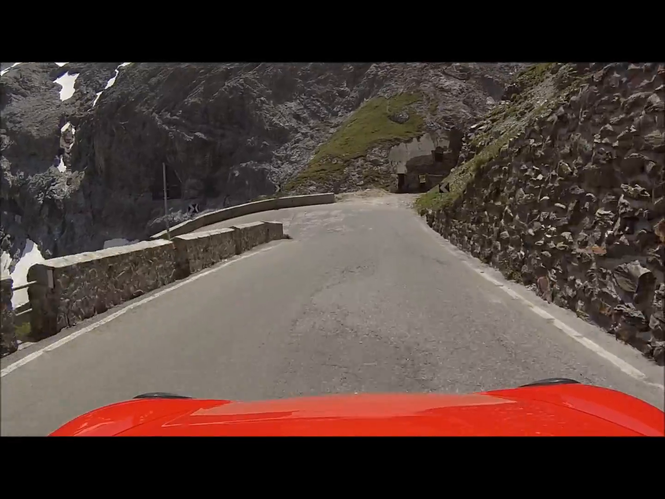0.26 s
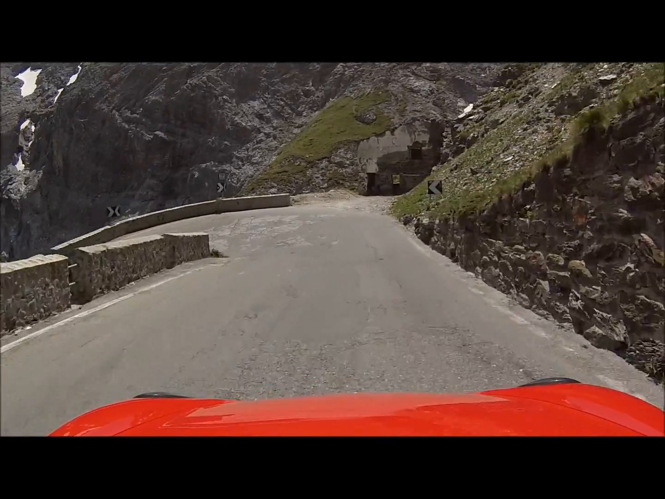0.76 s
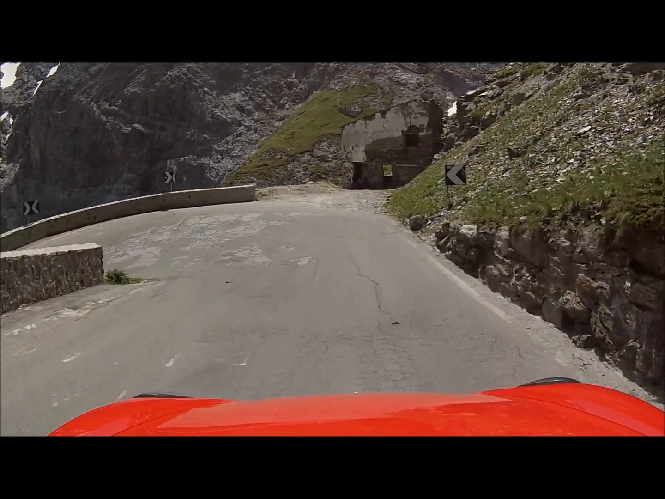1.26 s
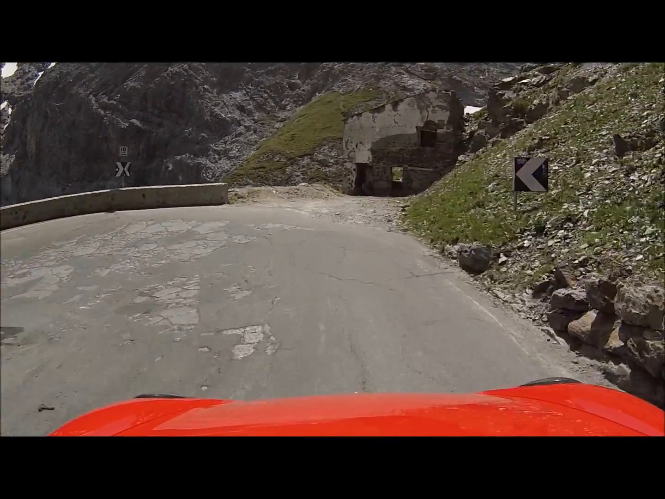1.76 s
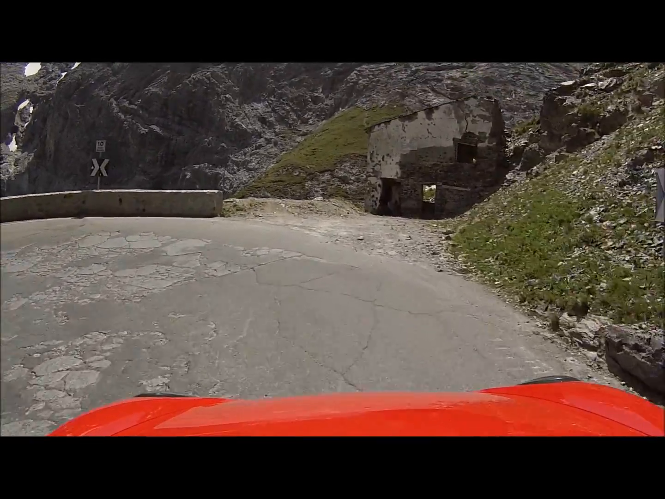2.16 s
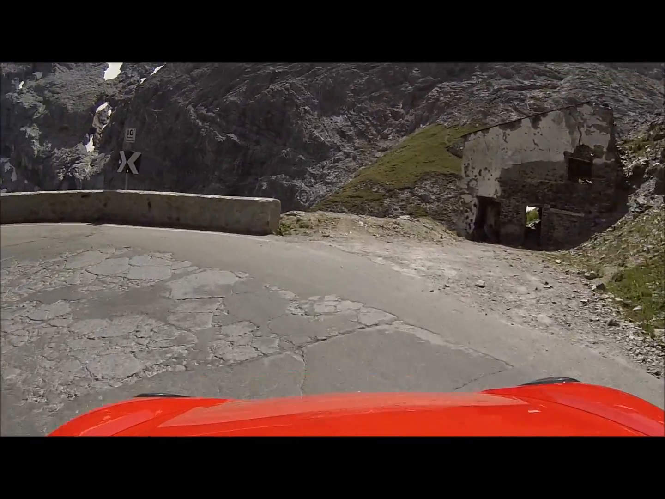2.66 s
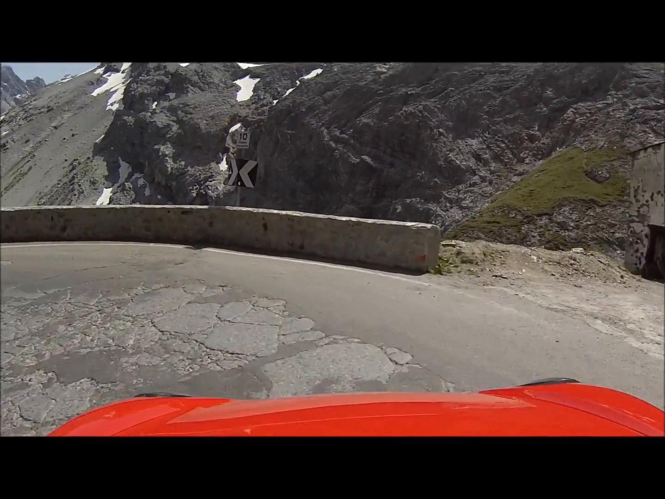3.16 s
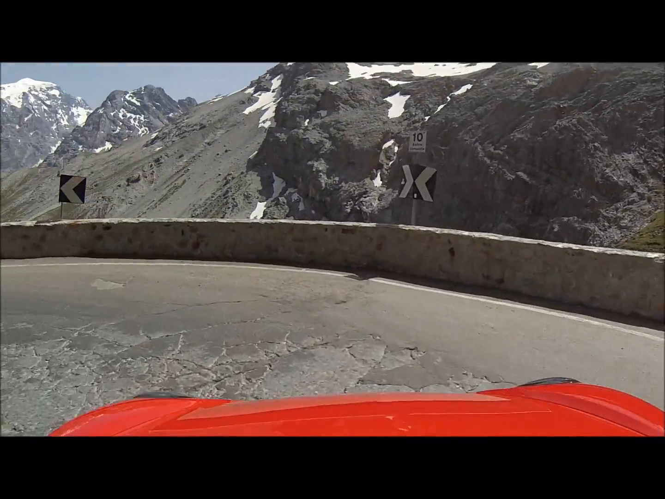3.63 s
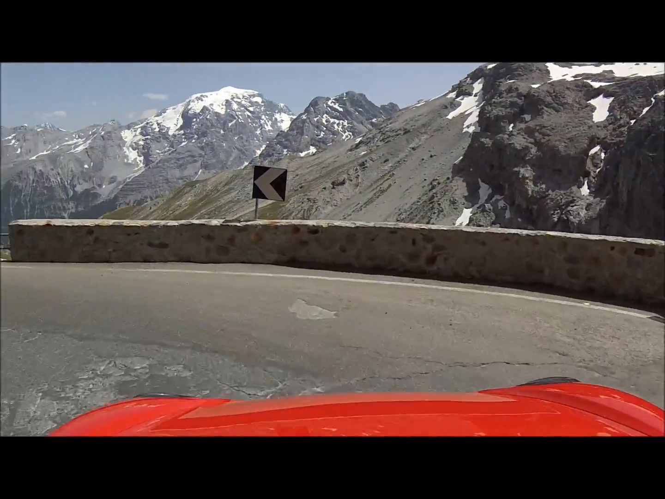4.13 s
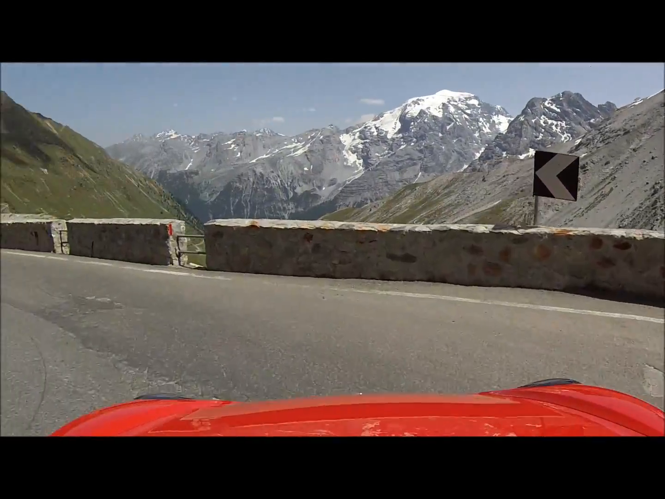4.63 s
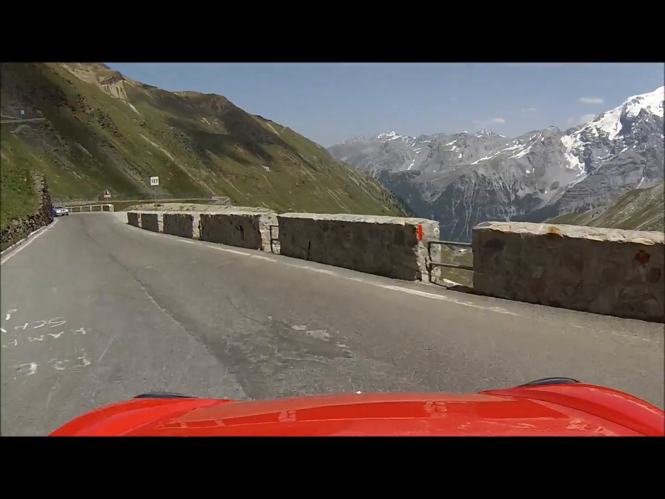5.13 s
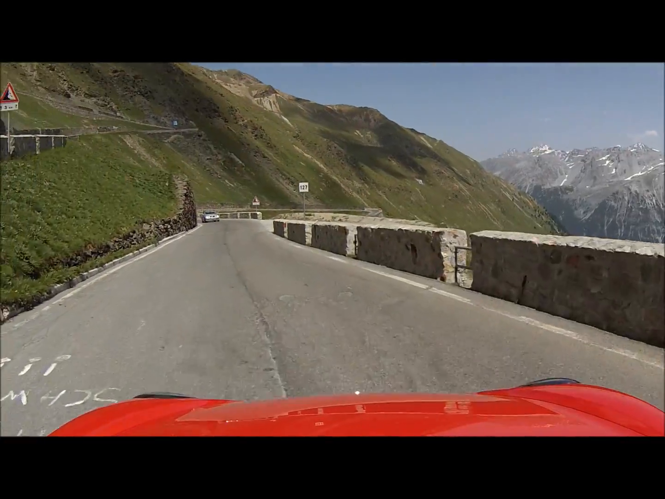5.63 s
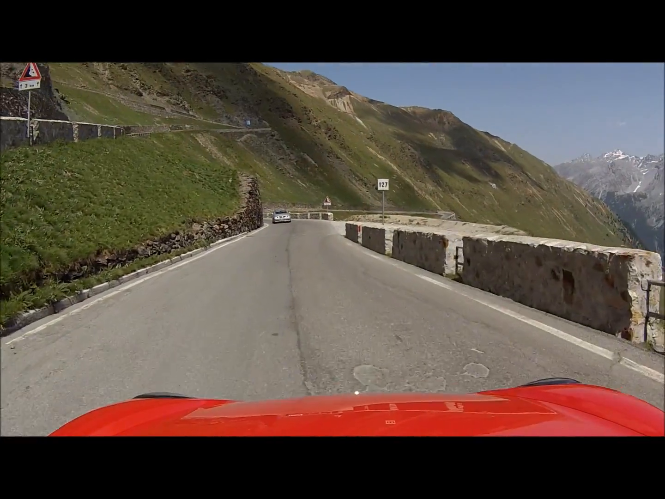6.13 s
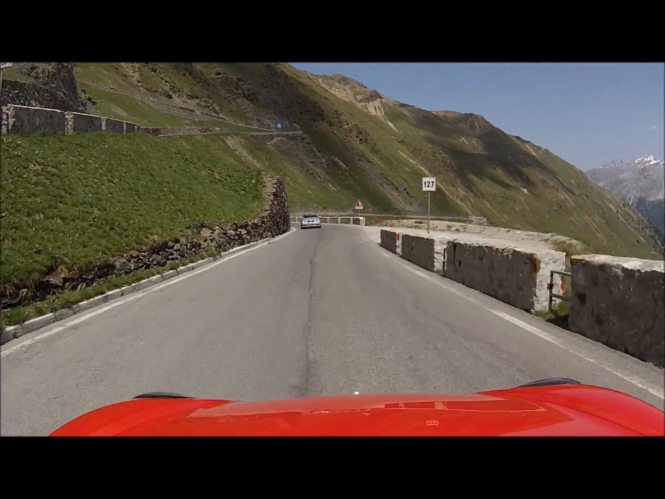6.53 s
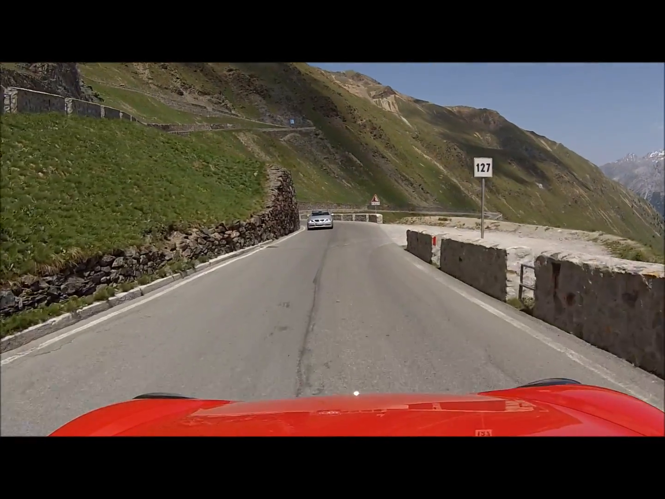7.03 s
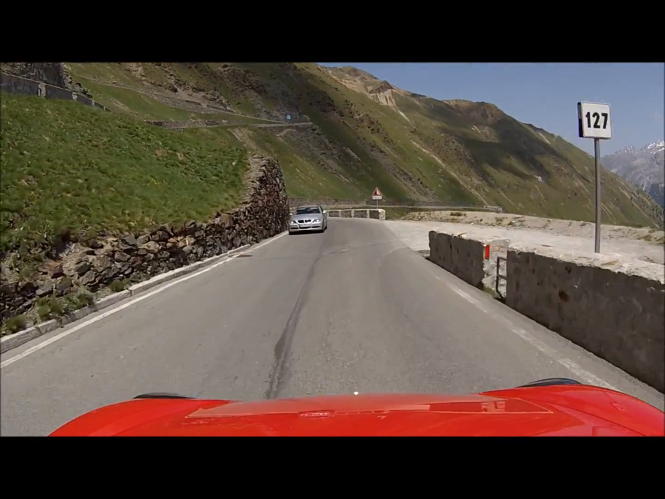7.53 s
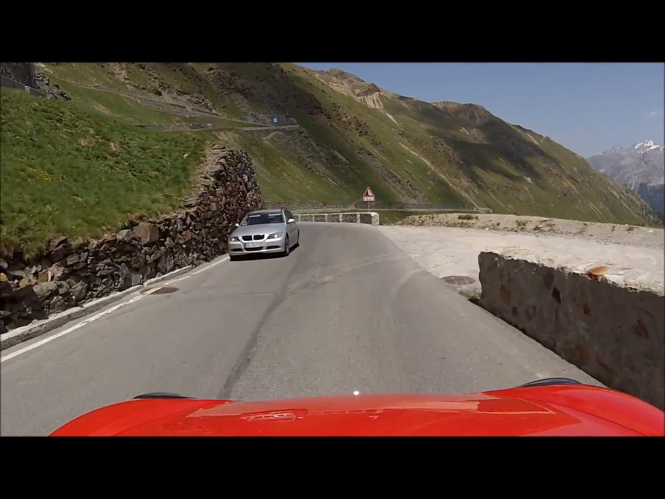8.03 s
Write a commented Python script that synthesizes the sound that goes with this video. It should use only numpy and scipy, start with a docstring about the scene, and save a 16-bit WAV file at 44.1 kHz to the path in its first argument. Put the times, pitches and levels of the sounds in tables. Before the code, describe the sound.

Close on a sports car's body on a mountain road, a six-cylinder engine drops from high revs while its exhaust sputters, cracks and bangs. It settles into a low, soft rumble round a hairpin, with tyre noise, faint grit and ticks. Then the throttle opens and the note climbs, growing hard and full with pulsing intake air.

```python
"""A six-cylinder sports car sinks off high revs, heard on its body, while the exhaust bangs and burbles.
It rolls near idle round a hairpin of cracked asphalt, then pulls away hard with a pulsing rush of air.
The exhaust note is a stack of firing harmonics swept through fixed pipe resonances.
Bangs are filtered spikes with noise puffs; gas, air, tyres and knocks are shaped noise; a whine is pure tones."""
import sys
import numpy as np
from scipy import signal
from scipy.fft import rfft, irfft
from scipy.io import wavfile
from scipy.ndimage import uniform_filter1d

SR = 44100
rng = np.random.default_rng(int(sys.argv[2]) if len(sys.argv) > 2 else 0)


def generate_wav(signal):
    """Clip the signal to [-1, 1] and save it as 16-bit WAV at the path in sys.argv[1]."""
    frames = np.transpose(np.atleast_2d(signal))
    scaled = np.clip(frames, -1, 1) * 32767
    pcm = np.round(scaled).astype(np.int16)
    wavfile.write(sys.argv[1], SR, pcm)


N = 365148
TIME = np.arange(N) / SR  # seconds
MID_REVS_HZ = 80  # firing rate of one bank at middling revs
THROTTLE_OPENS_S, THROTTLE_OPEN_S = 5.005, 5.9  # on leaving the hairpin
BROKEN_ROAD_START_S, BROKEN_ROAD_END_S = 1.9, 4.4  # cracked asphalt in the hairpin
EDGE_HZ = 15300  # upper limit of the band


def amp(db):
    """Decibels to gain."""
    return 10 ** (np.asarray(db) / 20)


def unit(x):
    """Scales to rms 1."""
    return x / np.sqrt(np.mean(x ** 2) + 1e-20)


def curves(rows):
    """Each column of a table as a curve over time."""
    s, *columns = np.transpose(rows)
    return [np.interp(TIME, s, column) for column in columns]


def read(points, hz):
    """Reads a spectrum on a log-frequency axis."""
    f, value = np.transpose(points)
    return np.interp(np.log(hz + 1), np.log(f), value)


def add(mix, s, sound):
    """Mixes a sound in at time s."""
    part = mix[max(round(s * SR), 0):][:len(sound)]
    part += sound[:len(part)]


def ringing(points, size=4096):
    """Causal, minimum-phase impulse response with the given spectrum."""
    log_gain = np.log(amp(read(points, abs(np.fft.fftfreq(size, 1 / SR)))))
    return np.fft.ifft(np.exp(np.conj(signal.hilbert(log_gain)))).real[:size // 2]


def colour(x, points):
    """Passes x through a body with the given spectrum, keeping the power of white noise."""
    response = ringing(points)
    return signal.oaconvolve(x, response / np.linalg.norm(response))[:len(x)]


def resonate(x, hz, width):
    """One resonance of peak gain 1."""
    return signal.lfilter(*signal.iirpeak(min(hz, SR / 2 - 1), hz / width, SR), x)


def bandpass(x, order, low_hz, high_hz):
    """Keeps one band of a sound."""
    return signal.sosfilt(signal.butter(order, [low_hz, high_hz], "band", fs=SR, output="sos"), x)


def wander(rate_hz):
    """Smooth random curve of rms 1, with a new random target rate_hz times a second."""
    steps = rng.standard_normal(N // 40)
    return unit(np.interp(TIME * rate_hz, np.arange(len(steps)), steps))


# Engine speed. Each row: time in seconds, firing rate of one cylinder bank in Hz.
ENGINE_SPEED = [(0, 157.2), (.37, 146.2), (1.1, 128.5), (1.52, 111.2), (1.93, 92), (2.2, 70.4),
                (2.36, 62.6), (2.75, 51.56), (3.1, 46.26), (3.83, 43.4), (4.1, 45.99), (4.6, 48.07),
                (5.65, 59.73), (6.15, 67.7), (6.58, 76.2), (7.1, 88.36), (7.7, 102.7), (8.28, 115.6)]


def engine_speed():
    """Firing rate of one bank in Hz, before jitter."""
    return curves(ENGINE_SPEED)[0]


def crank(jitter=0.0025):
    """Firing rate and the running count of firings; the count advances a little unsteadily."""
    hz = engine_speed()
    return hz, np.cumsum(hz * (1 + jitter * wander(30))) / SR


def with_revs(db_per_octave):
    """A gain that grows with engine speed, 1 at middling revs."""
    return amp(db_per_octave * np.log2(engine_speed() / MID_REVS_HZ))


# Engine load. Each row: time in seconds, strength of the exhaust pulses in dB.
PULSE_STRENGTH = [(0, -6.5), (1.2, -11.5), (1.85, -12.5), (2.1, -19.5), (2.4, -15.5), (4.1, -17),
                  (4.38, -15.5), (4.55, -28), (5.2, -30), (5.65, -22), (6.05, -6.5), (6.6, -2), (7.4, 0.5),
                  (8.28, 0.5)]


def engine_load():
    """Strength of the exhaust pulses in dB over time."""
    return curves(PULSE_STRENGTH)[0]


def throttle():
    """0 while coasting, 1 while pulling."""
    return np.clip((TIME - THROTTLE_OPENS_S) / (THROTTLE_OPEN_S - THROTTLE_OPENS_S), 0, 1)


# Air drawn in while pulling away. Each row: time in seconds, relative strength in dB.
AIR_DRAWN = [(5.7, -75), (5.73, -53), (5.94, -54), (6.07, -41.5), (6.22, -44), (6.61, -32.5), (7.82, -32.5),
             (8.25, -40)]


def airflow():
    """Strength of the air drawn through the open throttle."""
    return throttle() * amp(curves(AIR_DRAWN)[0])


def gusts(turns, depth, lumpy_db):
    """Turbulence that swells once a firing and varies irregularly in strength."""
    swell = unit((1 + depth * np.cos(2 * np.pi * turns)) * amp(lumpy_db * wander(110)))
    return swell * rng.standard_normal(N)


# Spells of late combustion off the throttle.
# Each row: start in seconds, length in seconds, then relative levels in dB of drone, burble and growl.
SPUTTER_SPELLS = [(0, 0.097, -27, -30, -31.5), (0.105, 0.03, -39, -28, -60), (0.4, 0.18, -37, -25, -43),
                  (0.745, 0.12, -31.5, -34, -34), (0.972, 0.5, -26, -34.5, -28.5),
                  (1.615, 0.074, -30, -34, -29.5), (1.718, 0.21, -54, -57, -35),
                  (1.928, 0.047, -36.5, -45, -52), (2.22, 0.2, -35, -44, -42)]


def sputters(attack_s=0.0054, release_s=0.022, sag_db_per_s=9.5):
    """Gains of drone, burble and growl: each spell flares up, sags and dies away."""
    gains = np.zeros((3, N))
    for start, length, *levels_db in SPUTTER_SPELLS:
        t = np.maximum(TIME - start, 0)
        attack = np.minimum(t / attack_s, 1)
        release = np.exp(-np.maximum(t - length, 0) / release_s)
        gains += amp(levels_db)[:, None] * attack * amp(-sag_db_per_s * t) * release
    return gains


# Silencer response to the firing rate and its octave. Each row: frequency in Hz, level in dB at 0 dB load.
SILENCER_BOOM = [(44, -30.5), (66, -26.5), (90, -23), (112, -26.5), (135, -36.5), (155, -28), (185, -25.5),
                 (225, -33), (300, -41)]
# Pipe spectrum for whole multiples of the firing rate. Each row: frequency in Hz, relative level in dB.
PIPE_SPECTRUM = [(130, -48), (175, -41.5), (235, -48.5), (300, -45.5), (400, -45), (490, -39), (555, -45.5),
                 (740, -46.5), (900, -72), (1500, -64), (2600, -98)]
# Pipe spectrum for the lines at thirds. Each row: frequency in Hz, relative level in dB.
UNEVEN_SPECTRUM = [(60, -73), (210, -50.5), (310, -48.5), (430, -59), (600, -57.5), (2600, -92)]
# The two banks cancel or reinforce each multiple.
# Each row: multiple of the firing rate, offset in dB coasting, offset in dB on the throttle.
BANK_BLEND = [(3, -1, -0.5), (4, 1, 2.5), (5, 1, -5.5), (6, 0, -2.5), (7, -12, -0.5), (8, 1, -6),
              (9, 1.5, -4.5), (10, -6.5, 0), (11, 0.5, -15), (12, -5, -9)]


def exhaust_note(hz, turns, pipe_db=3, uneven_db=4, waver_db=2.72, brighten=0.99, shake_db_per_octave=7,
                 rasp_hz=108, rasp_full_hz=680, rasp_db_per_octave=22, pull_db_per_octave=-9,
                 scatter_cycles=.45, count=60):
    """Pulse harmonics sweep through pipe resonances; three unequal cylinders a bank add lines at thirds."""
    load = engine_load()
    note = sum(amp(load + read(SILENCER_BOOM, k * hz)) * np.cos(2 * np.pi * k * turns) for k in (1, 2))
    # levels move slowly, so they are worked out on every 64th sample
    coarse, hz, load, opened = TIME[::64], hz[::64], load[::64], throttle()[::64]
    octaves = np.log2(hz / MID_REVS_HZ)
    # pulses are sharp when coasting at high revs and when pulling from low revs
    rasp = (1 - opened) * rasp_db_per_octave * np.maximum(np.log2(hz / rasp_hz), 0)
    pull = opened * pull_db_per_octave * octaves
    multiples, coasting, pulling = np.transpose(BANK_BLEND)
    for k in range(4, count):
        order = k / 3
        if order == 2:  # already in the boom
            continue
        line_hz = order * hz
        if order.is_integer():  # these stay roughly in step and form one pulse a firing
            banks = (1 - opened) * np.interp(order, multiples, coasting)
            banks = banks + opened * np.interp(order, multiples, pulling)
            level = read(PIPE_SPECTRUM, line_hz) + pipe_db + banks + pull
            level = level + rasp * np.minimum(line_hz / rasp_full_hz, 1)
            lag = scatter_cycles * (rng.random() - .5)
        else:
            level = read(UNEVEN_SPECTRUM, line_hz) + uneven_db + shake_db_per_octave * octaves
            lag = rng.random()
        # weak pulses are rounder, so the high lines fade first
        level = level + load * np.minimum(line_hz / 450, 1.2) ** brighten
        level += waver_db * unit(uniform_filter1d(rng.standard_normal(len(coarse)), size=120))
        note += np.interp(TIME, coarse, amp(level)) * np.cos(2 * np.pi * (order * turns - lag))
    return np.sqrt(2) * note  # makes the line levels rms


# Colour of the exhaust drone. Each row: frequency in Hz, relative level in dB.
DRONE_SPECTRUM = [(40, -15.5), (110, -0.5), (230, -0.5), (340, 6), (420, -1), (520, -4), (650, -9.5),
                  (900, -12), (2000, -57.5)]


def gas_flow(turns, sputter, idle_db=-48, drone_db=-39.0, drone_db_per_octave=10, sputter_db=-2):
    """Drone of one gas puff a firing: a steady floor that grows with load and revs and flares in sputters."""
    driven = amp(drone_db + .7 * engine_load()) * with_revs(drone_db_per_octave)
    level = np.sqrt(amp(idle_db) ** 2 + driven ** 2 + (amp(sputter_db) * sputter) ** 2)
    puffs = gusts(turns, depth=.7, lumpy_db=.9)
    return level * colour(puffs, DRONE_SPECTRUM)


def burble(sputter, burble_db=-1, idle_db=-56, burble_hz=72, width_hz=45):
    """Low lumps of late combustion over a faint rumble."""
    lumps = resonate(rng.standard_normal(N), burble_hz, width_hz)
    lumps = unit(resonate(lumps, burble_hz, 2 * width_hz))
    return np.hypot(amp(idle_db), amp(burble_db) * sputter) * lumps


def growl(sputter, centre_hz=290, rev_share=.58, width_hz=50, squash=0.5):
    """Ragged combustion keeps one silencer resonance ringing; its pitch follows the revs."""
    hz = centre_hz * (1 - rev_share + rev_share * engine_speed() / MID_REVS_HZ)
    noise = rng.standard_normal(N) + 1j * rng.standard_normal(N)
    ragged = signal.lfilter(*signal.butter(2, width_hz, fs=SR), noise)
    ragged = ragged / (abs(ragged) + 1e-9) ** squash  # uneven in timing more than in strength
    carrier = np.exp(2j * np.pi * np.cumsum(hz) / SR)
    return sputter * unit((ragged * carrier).real)


# Colour of the tyre and air rush. Each row: frequency in Hz, relative level in dB.
RUSH_SPECTRUM = [(300, -12), (600, 0), (740, -5.5), (880, 2.5), (1130, -0.5), (1370, 2), (1600, -4),
                 (1850, -10.5), (2400, -19.5), (2620, -14), (3000, -19.5), (4600, -25.5), (5900, -29.5),
                 (8800, -26), (12500, -31), (15000, -46)]


def rush(turns, road_db=-57, surface_db=1.0, coasting_db=-51.0, coasting_db_per_octave=17,
         pulling_db=-4, pulse_depth=0.24):
    """Tyres on an uneven road, plus air pumped by the revs when coasting and drawn in when pulling."""
    road = amp(road_db + surface_db * wander(14))
    coasting = (1 - throttle()) * amp(coasting_db) * with_revs(coasting_db_per_octave)
    level = np.sqrt(road ** 2 + coasting ** 2 + (amp(pulling_db) * airflow()) ** 2)
    return level * colour(gusts(turns, pulse_depth * throttle(), lumpy_db=1.1), RUSH_SPECTRUM)


# Colour of the fine hiss. Each row: frequency in Hz, relative level in dB.
HISS_SPECTRUM = [(900, 8.5), (2200, 10), (3400, 3.5), (4400, 5), (6000, -2), (8800, -2), (12800, -6.5),
                 (14500, -8)]
# Stereo likeness of the hiss. Each row: frequency in Hz, left-right correlation from 0 to 1.
HISS_LIKENESS = [(1000, 1), (2500, 0.99), (4000, 0.96), (8000, 0.59), (13000, 0.45)]


def hiss(turns, road_db=-61, coasting_db=-62, coasting_db_per_octave=9, pulling_db=-25, pulse_depth=0.17):
    """Fine hiss that follows revs and airflow, pulsing more under load; its treble differs at each ear."""
    pulsing = pulse_depth * np.minimum(amp(engine_load()), 1)
    same = np.clip(read(HISS_LIKENESS, np.fft.rfftfreq(N, 1 / SR)), 0, 1)
    mid, side = (rfft(colour(gusts(turns, pulsing, lumpy_db=1.5), HISS_SPECTRUM)) for _ in range(2))
    mid = irfft(mid, N)
    side = irfft(side * np.sqrt((1 - same) / (1 + same)), N)
    coasting = (1 - throttle()) * amp(coasting_db) * with_revs(coasting_db_per_octave)
    level = np.sqrt(amp(road_db) ** 2 + coasting ** 2 + (amp(pulling_db) * airflow()) ** 2)
    return level * np.array([mid + side, mid - side])


# Afterfire bangs. Each row: start in seconds, sharp crack peak in dB, puff of gas in dB before colouring.
BANGS = [(0.105, -38, -26), (0.4162, -21, -14), (.440, -15, -14.5), (0.455, -26, -16.5), (0.4671, 3, -14.5),
         (.488, -19, -26), (.523, -15, -20), (.542, -10.5, -17), (.598, -23, -16), (0.621, -22, -13),
         (0.635, 4, -16), (.655, -4.5, -12.5), (.728, -15, -13.5), (0.747, -20, -13.5), (.777, -12, -16.5),
         (0.801, -25, -18), (0.807, -11, -12.5), (0.8287, -4.5, -11), (0.91, -15, -12.5), (.931, -21, -14),
         (.941, -15, -20.5), (0.993, -15, -15), (1.085, -19.5, -25), (1.634, -34, -29.5), (2.232, -43, -35)]
# Colour of a crack. Each row: frequency in Hz, relative level in dB.
CRACK_SPECTRUM = [(30, -13), (150, -0.5), (550, -1.5), (850, -1), (1300, 2.5), (1650, -6), (2200, -12.5),
                  (3200, -16.5), (6000, -42), (15000, -38)]
# Colour of a puff. Each row: frequency in Hz, relative level in dB.
PUFF_SPECTRUM = [(25, -37), (70, 12), (200, 1.5), (450, 11.5), (750, -3), (1400, 0.5), (2100, -19.5),
                 (2700, -28), (3400, -32.5), (6000, -40.5), (15000, -41)]
# Tailpipe resonances. Each row: frequency in Hz, width in Hz, gain in dB.
TAILPIPE_MODES = [(878, 51, 1.5), (1423, 48, 5), (2070, 57, -4), (2600, 63, -1), (3630, 110, -21)]


def afterfire(rise_s=0.00087, decay_s=0.0088, dull_hz=1300, sharp_hz=8000, grain_db=2.0, ring_db=-8):
    """Unburnt fuel bangs: a spike, steeper when strong, and a gritty gas puff ring the tailpipe."""
    t = np.arange(SR // 10) / SR
    puff_shape = (1 - np.exp(-t / rise_s)) * np.exp(-t / decay_s)
    spike, cracks, puffs = ringing(CRACK_SPECTRUM), np.zeros(N), np.zeros(N)
    for s, crack_db, puff_db in BANGS:
        edge_hz = min(dull_hz + sharp_hz * amp(crack_db) ** 4, SR / 2 - 1)
        shock = signal.lfilter(*signal.butter(2, edge_hz, fs=SR), spike)
        add(cracks, s, -amp(crack_db) * shock / abs(shock).max())
        add(puffs, s, amp(puff_db) * puff_shape * rng.standard_normal(len(t)))
    puffs = puffs * unit(amp(grain_db * wander(500)))
    struck = puffs + amp(ring_db) * cracks
    ring = sum(amp(db) * resonate(struck, hz, width) for hz, width, db in TAILPIPE_MODES)
    return cracks + colour(puffs, PUFF_SPECTRUM) + ring


# Faint high ticks in the bend. Each row: start in seconds, relative level in dB.
FAINT_TICKS = [(1.6023, -36.5), (2.5394, -46), (2.712, -47), (2.86, -49), (3.08, -47), (3.458, -48),
               (3.57, -48), (3.619, -49), (4.0394, -48), (4.2394, -49)]


def ticks(tick_db=-8, decay_s=0.013):
    """Faint high ticks: short decaying bursts of band-limited noise."""
    t, out = np.arange(SR // 20) / SR, np.zeros(N)
    for s, db in FAINT_TICKS:
        add(out, s, amp(db + tick_db) * np.exp(-t / decay_s) * rng.standard_normal(len(t)))
    return bandpass(out, 3, 4500, 11500)


def grit(grit_db=-61, spread_db=3, per_s=14, decay_s=0.0048):
    """Loose grit crunches faintly under the tyres: random hits start short decaying noise bursts."""
    on_stretch = (TIME > BROKEN_ROAD_START_S) * (TIME < BROKEN_ROAD_END_S)
    hits = (rng.random(N) < per_s / SR) * on_stretch
    sizes = hits * amp(grit_db + spread_db * np.minimum(rng.exponential(1, N), 2))
    envelope = signal.lfilter([1], [1, -np.exp(-1 / (decay_s * SR))], sizes + 1e-18)
    return bandpass(envelope * rng.standard_normal(N), 2, 900, 11500)


# Brief whistles. Each row: start in seconds, length in seconds, frequency in Hz, width in Hz, level in dB.
BRIEF_WHISTLES = [(1.95, 0.33, 830, 160, -50), (1.95, .38, 1500, 550, -53), (4.3, .07, 10820, 1400, -64),
                  (4.38, .1, 4380, 400, -67), (5.573, .04, 880, 400, -51.5)]


def whistles():
    """Short whistles: noise narrowed by two equal resonances, faded at both ends."""
    out = np.zeros(N)
    for s, length, hz, width, db in BRIEF_WHISTLES:
        narrow = resonate(resonate(rng.standard_normal(SR), hz, width), hz, width)
        tone = unit(narrow[-int(length * SR):])
        add(out, s, amp(db) * tone * signal.windows.tukey(len(tone), .5))
    return out


# Dull knocks through the body. Each row: start in seconds, level in dB before colouring.
BODY_KNOCKS = [(3.983, -40), (4.964, -40.5), (4.98, -46), (5.093, -42), (5.31, -48), (5.586, -46),
               (7.795, -29), (7.823, -25.5)]
# What the body passes of a knock. Each row: frequency in Hz, relative level in dB.
BODY_SPECTRUM = [(50, -28), (150, 4.5), (380, 6), (700, -7.5), (1500, -23), (3000, -30), (9000, -37)]


def knocks(decay_s=0.032):
    """Short jolts, as decaying noise, that die quickly in the bodywork."""
    t, out = np.arange(SR // 10) / SR, np.zeros(N)
    for s, db in BODY_KNOCKS:
        add(out, s, amp(db) * np.exp(-t / decay_s) * rng.standard_normal(len(t)))
    return colour(out, BODY_SPECTRUM)


# Faint high whine. Each row: frequency in Hz, level in dB before the flutter.
WHINE_TONES = [(5669, -78.5), (8430, -77), (11294, -78), (14099, -81)]


def whine(start_s=4.4, end_s=7.5, flutter_hz=35):
    """A thin stack of high tones that comes and goes at random."""
    gate = unit(np.maximum(wander(flutter_hz), 0)) * (TIME > start_s) * (TIME < end_s)
    return gate * sum(amp(db) * np.cos(2 * np.pi * hz * TIME) for hz, db in WHINE_TONES)


# Intake resonances. Each row: frequency in Hz, width in Hz, relative level in dB.
INTAKE_CAVITIES = [(872, 54, -4), (1347, 105, -1.5), (1578, 55, -4.5), (2072, 110, -6), (2690, 450, -14.5),
                   (3300, 110, -25), (4300, 440, -22)]


def intake(turns, intake_db=-10, intake_db_per_octave=12):
    """Gulps of air, one a firing, ring the intake's cavities, harder as the revs climb."""
    gulps = gusts(turns, depth=.95, lumpy_db=1)
    roar = np.zeros(N)
    for hz, width, db in INTAKE_CAVITIES:
        roar += amp(db) * unit(resonate(resonate(gulps, hz, width), hz, 2 * width))
    return amp(intake_db) * airflow() * with_revs(intake_db_per_octave) * unit(roar)


def microphones(x, self_noise_db=-68, apart_db=-8, bass_cut_hz=3):
    """Two close capsules share a faint steady hiss, plus a little of their own; the left loses deep bass."""
    noise = rng.standard_normal(N) + amp(apart_db) * rng.standard_normal((2, N))
    left = signal.lfilter(*signal.butter(1, bass_cut_hz, "high", fs=SR), x[0])
    return np.array([left, x[1]]) + amp(self_noise_db) * noise


def scene():
    """The car sits in the middle; only its fine hiss has width."""
    hz, turns = crank()
    droning, burbling, growling = sputters()
    exhaust = exhaust_note(hz, turns) + gas_flow(turns, droning)
    exhaust = exhaust + burble(burbling) + growl(growling) + afterfire()
    air_and_road = intake(turns) + rush(turns) + hiss(turns) + knocks() + grit()
    return exhaust + air_and_road + ticks() + whistles() + whine()


def record(dry):
    """Peaks clip at full scale; then a steep low-pass limits the band."""
    clipped = np.clip(microphones(dry), -1, 1)
    lowpass = signal.firwin(511, EDGE_HZ, window=("kaiser", 9), fs=SR)
    return signal.oaconvolve(clipped, lowpass[None], "same")


dry = scene()
out = record(dry)
generate_wav(out)
```